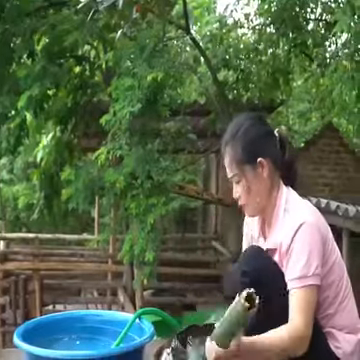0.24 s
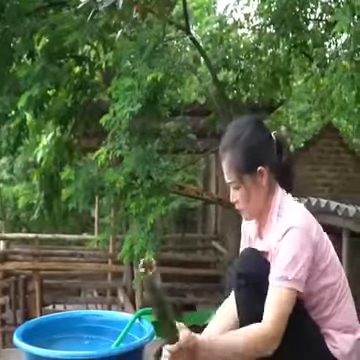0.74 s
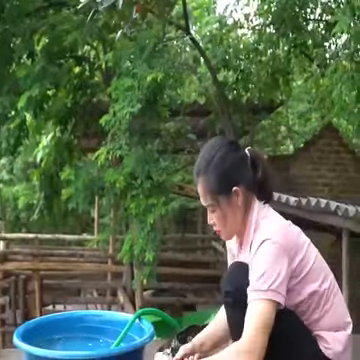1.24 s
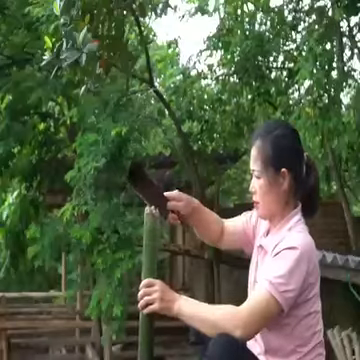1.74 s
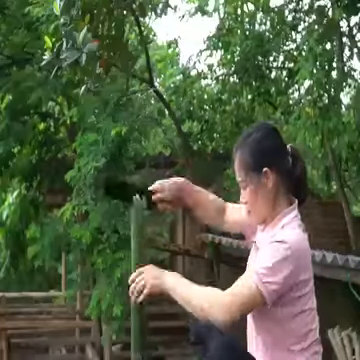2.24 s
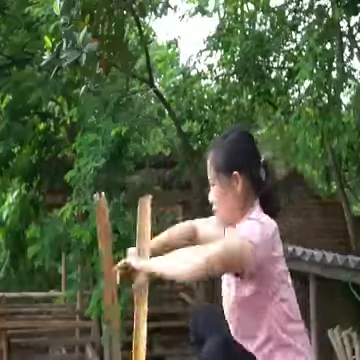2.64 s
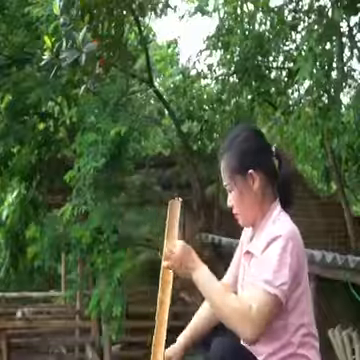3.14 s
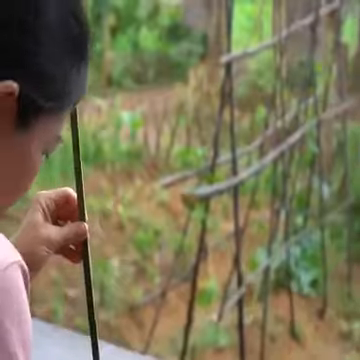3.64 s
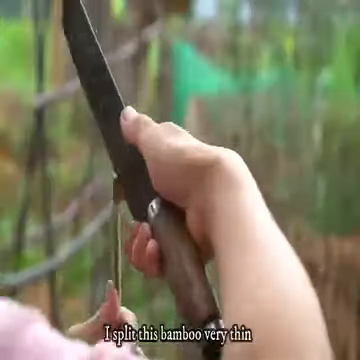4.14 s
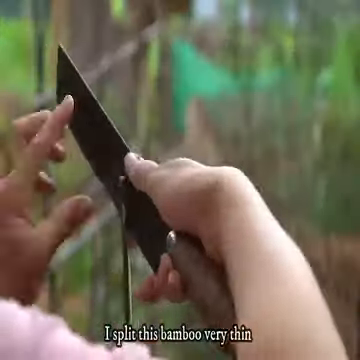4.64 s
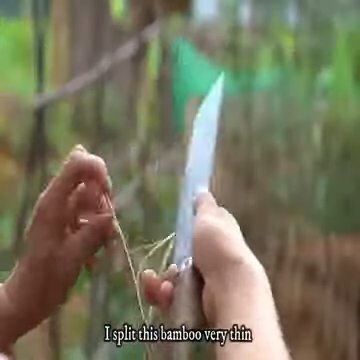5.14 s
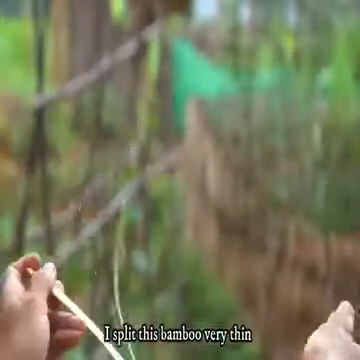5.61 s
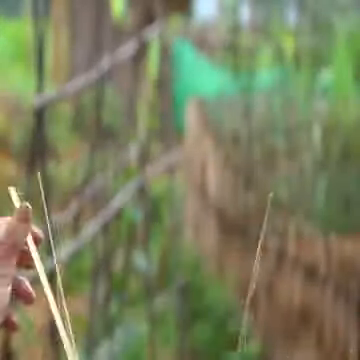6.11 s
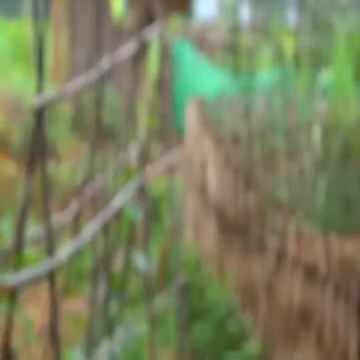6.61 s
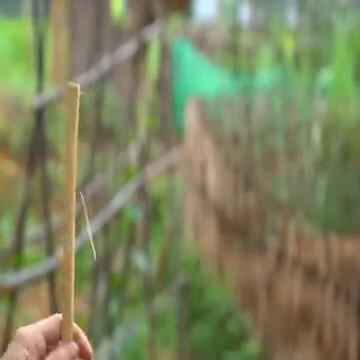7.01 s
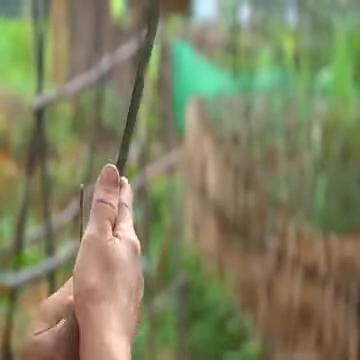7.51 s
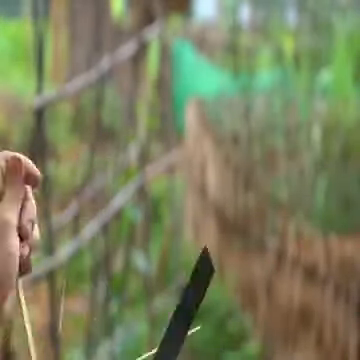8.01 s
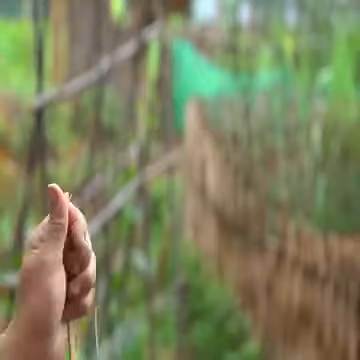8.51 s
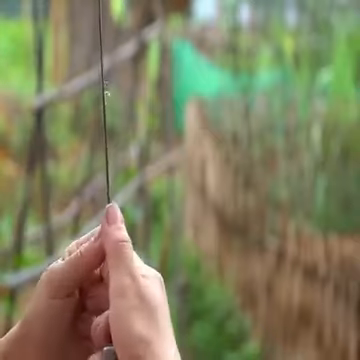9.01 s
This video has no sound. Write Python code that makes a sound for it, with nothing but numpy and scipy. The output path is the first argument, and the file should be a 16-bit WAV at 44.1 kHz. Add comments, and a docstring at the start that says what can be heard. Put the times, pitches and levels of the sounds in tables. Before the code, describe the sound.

Outdoors amid steady insect buzz, a bamboo pole is chopped with deep hollow knocks, then a thin strip is quietly tapped, peeled and snapped.

```python
"""Splitting and peeling green bamboo

A heavy knife is knocked into the end of a standing bamboo pole: its wall rings, it thuds on the ground, fibres tear.
Then a thin slat is tapped and peeled: short damped rings, slips built of tiny catches, and snaps of noise.
Insects buzz in the trees (bands of noise), brighter and louder at the second spot, with faint far-off tones.
The open air hushes and a light wind rumbles on the microphone, both made from coloured noise."""
import sys
import numpy as np
from scipy import signal
from scipy.fft import rfft, irfft, next_fast_len
from scipy.io import wavfile
from scipy.ndimage import uniform_filter1d

SR = 44100
rng = np.random.default_rng(int(sys.argv[2]) if len(sys.argv) > 2 else 0)


def wav_out(sig):
    """Save sig, one row per channel (or a flat mono array), as 16-bit PCM at SR to the path in sys.argv[1]."""
    wavfile.write(sys.argv[1], SR, np.round(np.clip(np.atleast_2d(sig).T, -1, 1) * 32767).astype(np.int16))


N = 408366
TIME = np.arange(N) / SR   # seconds from the start
AGE = np.arange(SR // 3) / SR   # seconds since a contact

# Blows on the pole: (time [s], wall level [dB], pitch favoured by the struck place [Hz],
# contact brightness [Hz], thud level [dB], thud pitch [Hz], fibre crack level [dB],
# time between rebounds [s], loss per rebound [dB])
POLE_BLOWS = [(0.002, -8, 470, 3540, -9.5, 169, -18, .009, 9),
              (0.394, -34, 480, 600, -27, 250, -65, .01, 16),
              (0.4646, -11, 890, 910, -18.5, 228, -59, .006, 6),
              (0.509, -36, 480, 600, -21.5, 187, -66, 0.0117, 10),
              (0.5605, -18.5, 1180, 1400, -28.5, 244, -58, .004, 20),
              (0.908, -13, 1730, 2310, -4, 377, -30.5, .0105, 12),
              (2.0246, -15, 1000, 2280, -1, 247, -23.5, 0.0079, 11.5),
              (2.2609, -10, 800, 850, 4.5, 252.5, -26.5, 0.021, 17.5),
              (2.573, -16.5, 910, 2300, -28, 333, -22.5, 0.0049, 4.5),
              (3.225, -12, 970, 2300, -11.5, 330, -25.5, .013, 9.5),
              (3.2691, -18, 634, 1150, -20, 316, -40, .009, 3.5),
              (3.800, -22, 890, 1400, -23.5, 393, -53, 0.0096, 4.5)]
# Ringing tones of the pole's wall: (pitch [Hz], level [dB], share of the decay time [ratio])
POLE_TONES = [(483, -4, 0.66), (774, -6, 0.49), (867, -5, 0.85), (968, -10.5, 1.13), (1162, -4, 0.74),
              (1382, -2.5, 0.57), (1612, -4, 0.78), (2043, -8.5, 0.86), (2500, -15.5, 2.4), (3400, -4, 0.4),
              (4286, 0, 0.26)]
# Pole against the ground: (multiple of the thud pitch [ratio], level [dB], share of its decay time [ratio])
GROUND_TONES = [(.52, 2, 0.58), (1, 2.5, 0.83), (1.27, -3, 0.92), (1.75, -10.5, 0.9)]
# Colour of tearing fibres: (frequency [Hz], level per Hz [dB])
FIBRE_COLOUR = [(200, -1.5), (900, 12), (1800, -8), (2600, -3.5), (3600, 2), (5000, -3.5), (7000, -12),
                (10000, -17), (15500, -25)]
# Knife taps on the slat: (time [s], level [dB], favoured pitch [Hz], contact brightness [Hz], decay by 60 dB [s])
SLAT_TAPS = [(4.1707, -12.5, 1520, 2190, 0.018), (4.428, -11.5, 1480, 1350, 0.016),
             (6.645, -22, 450, 900, 0.03), (7.120, -38, 1600, 2500, 0.013), (7.156, -27, 1300, 2500, 0.011),
             (7.689, -36, 890, 785, 0.05), (8.0687, -36, 636, 700, 0.017), (8.5197, -33, 634, 2000, 0.0098),
             (8.5998, -38, 900, 795, 0.025)]
# Ringing tones of the slat: (pitch [Hz], level [dB], share of the decay time [ratio])
SLAT_TONES = [(467, 2.5, 0.95), (614, -0.5, 0.83), (948, -1.5, 1.74), (1080, -5.5, 0.87), (1260, 2, 0.52),
              (1565, -1, 0.78), (2335, -6.5, 0.79), (3130, -3, 0.79), (4230, -4, 0.55)]
# Bamboo slips along the blade: (time [s], rms level [dB], brightness [Hz])
BLADE_SLIPS = [(0.877, -48.5, 1300), (2.559, -37, 900), (2.702, -45, 2980), (2.923, -47, 2010),
               (3.213, -37, 700), (3.233, -33, 1550), (3.488, -48, 1200), (3.762, -43.5, 700),
               (3.935, -44, 890), (4.071, -35, 1170), (4.243, -43.5, 1020), (4.315, -45, 1270),
               (4.805, -50, 910), (5.915, -45.5, 450), (6.162, -43, 610), (6.645, -41.5, 2000),
               (6.893, -45, 500), (7.05, -38.5, 2020), (7.981, -46, 1740), (8.165, -44, 1500),
               (8.357, -44, 2800), (8.425, -43.5, 2950), (8.817, -45.5, 2400)]
# Fingers work along the slat in runs of faint slips: (start [s], end [s], typical rms level [dB])
HANDLING_RUNS = [(3.998, 4.41, -51.5), (7.569, 7.85, -49.5), (8.529, 8.88, -49)]
# Dry fibres snap: (time [s], level [dB], decay by 60 dB [s])
FIBRE_SNAPS = [(0.266, -42, 0.046), (4.777, -49, .04), (6.153, -30, 0.054)]
# Colour of a snap: (frequency [Hz], level per Hz [dB])
SNAP_COLOUR = [(500, 5), (1000, 2), (2500, 2.5), (5000, 1), (9000, -4), (15500, -10)]
# The nearest insect: (pitch [Hz], half width [Hz], typical level [dB], pulses per second [Hz])
NEAR_INSECT = (4310, 137, -52.5, 43.5)
# Bands of the insect chorus: (pitch [Hz], half width [Hz],
# relative level at the first spot [dB], relative level at the second spot [dB])
CHORUS_BANDS = [(2835, 370, -11.5, -7), (3920, 610, -5, -4), (5210, 520, -5.5, -4.5),
                (5670, 400, -14.5, -7), (6500, 1240, -8.5, -7)]
# Relative level of the chorus, one list for each spot: (time [s], level [dB])
CHORUS_SWELL = [
    [(0.0, -47), (2.12, -49), (2.81, -47), (3.84, -51)],
    [(3.9, -45.5), (4.05, -46.5), (4.97, -44), (9.26, -48)],
]
# Colour of the highest insects: (frequency [Hz], level per Hz [dB])
SHRILL_COLOUR = [(5500, -15), (6900, -9.5), (7500, 1), (9000, -2), (10200, -6), (10700, -11), (11900, -9),
                 (12400, -15), (13800, -19.5), (15500, -35)]
# Bouts of the highest insects: (start [s], crest [s], stop [s], level at the crest [dB])
SHRILL_BOUTS = [(0, .45, .7, -59.5), (1.2, 2.3, 4, -60.5), (3.868, 4.255, 4.8, -49),
                (4.6, 5.85, 6.16, -49.5), (6.0, 7.157, 7.57, -49.5), (7.6, 8.449, 9.17, -54.5)]
# Faint held tones far away, perhaps birds: (middle [s], half length [s], pitch [Hz], level [dB])
FAR_TONES = [(1.22, 0.19, 1164, -62.5), (1.83, 0.12, 578, -62), (3.56, 0.21, 562, -61),
             (8.92, 0.2, 665, -58)]
# Relative level of the open air: (time [s], level [dB])
AIR_LEVEL = [(0.0, -55.5), (1.29, -57.5), (2.32, -59.5), (4.3, -54.5), (4.62, -57), (7.14, -56),
             (8.85, -55), (9.26, -56.5)]
# Colour of the open air at each spot: (frequency [Hz], level per Hz [dB])
AIR_COLOUR_FIRST = [(80, -0.5), (150, 2.5), (300, -1.5), (600, -4.5), (1150, -7.5), (1400, -12),
                    (1850, -15.5), (3000, -10.5), (8000, -32), (15000, -44)]
AIR_COLOUR_SECOND = [(80, 1), (220, -6), (400, -7), (700, -9), (900, -8), (1200, -10.5), (1900, -13.5),
                     (3000, -22), (8000, -39), (15000, -41)]
# Gusts on the microphone: (time [s], slow swell level [dB], relative buffet level [dB], half length [s])
WIND_GUSTS = [(0.018, -17.5, -37, 0.1), (0.488, -29, -48, 0.18), (0.855, -30, -57, 0.19),
              (1.49, -30.5, -65, 0.094), (3.15, -32.5, -50.5, 0.31), (3.783, -28.5, -49, 0.13),
              (4.174, -18.5, -36.5, 0.18), (4.435, -24.5, -67, 0.24), (6.125, -30, -66, 0.2),
              (6.744, -34, -58, .27), (8.252, -39, -67, 0.27)]
# Colour of the slow swell: (frequency [Hz], level per Hz [dB])
SWELL_COLOUR = [(10, -5.5), (20, 6), (28, -1.5), (45, -7), (70, -23), (180, -40), (2000, -100)]
# Colour of the quicker buffets: (frequency [Hz], level per Hz [dB])
BUFFET_COLOUR = [(30, -27), (55, -5.5), (75, 1.5), (105, -8.5), (180, -17.5), (500, -62), (2000, -100)]

REBOUNDS = 2
WALL_T60_S, CRACK_T60_S = 0.062, 0.069   # a t60 is the time taken to fade by 60 dB
THUD_CYCLES = 7.67   # cycles to fade by 60 dB, for a thud of 0 dB
THUD_DAMPING = 0.19   # a harder blow digs the pole in and shortens the thud
SLIP_S = 0.03   # time scale of a slip
HANDLING_PER_S, HANDLING_HZ, HANDLING_SPREAD_DB = 22.0, 905, 2.5
# slope around a bout's crest, extra slope after its stop, and the level between bouts
BOUT_SWELL_DB_PER_S, BOUT_EDGE_DB_PER_S, SHRILL_REST_DB = 5, 79, -63.5
MOVE_S = 3.868   # the second spot begins here
CUTOFF_HZ = 15700


def pole():
    """Each contact rings the wall, drives the pole against the ground and tears fibres."""
    out = np.zeros(N)
    for s, wall_db, favoured_hz, contact_hz, thud_db, thud_hz, crack_db in contacts():
        wall = from_db(wall_db) * wall_ring(favoured_hz, contact_hz)
        thud = from_db(thud_db) * ground_thud(thud_db, thud_hz)
        crack = from_db(crack_db) * fibre_crack()
        add(out, s, wall + thud + crack)
    return out


def contacts():
    """Each blow is followed by quick rebounds, every one weaker by the same step."""
    for s, wall_db, favoured_hz, contact_hz, thud_db, thud_hz, crack_db, gap, loss_db in POLE_BLOWS:
        for k in range(REBOUNDS + 1):
            lost = k * loss_db
            yield (s + k * gap, wall_db - lost, favoured_hz, contact_hz,
                   thud_db - lost, thud_hz, crack_db - lost)


def wall_ring(favoured_hz, contact_hz, crunch_db=-7, crunch_t60=0.08):
    """The hollow wall rings at its own pitches while the contact grinds for a moment."""
    ring = struck(POLE_TONES, favoured_hz, contact_hz, WALL_T60_S, spread_db=1., favour_db=13, octaves=0.32)
    chatter = rng.standard_normal(len(AGE)) * dying(crunch_t60)
    short_ring = struck(POLE_TONES, favoured_hz, contact_hz, 0.0036, spread_db=2.5)
    crunch = signal.fftconvolve(chatter, short_ring)[:len(AGE)]
    return ring + from_db(crunch_db) * crunch / np.abs(crunch).max()


def ground_thud(thud_db, thud_hz, shake_hz=39, shake_db=-24, shake_t60=0.71):
    """The pole hits the ground with a few low, quickly damped tones; a deep low tone rings on after."""
    t60 = THUD_CYCLES / thud_hz * from_db(-THUD_DAMPING * thud_db)
    thud = np.zeros(len(AGE))
    for k, (ratio, db, share) in enumerate(GROUND_TONES):
        tone = np.sin(2 * np.pi * ratio * thud_hz * AGE)
        thud += (-1) ** k * from_db(db) * tone * dying(share * t60)
    thud = low_pass(scattered(thud, level_db=-9.5, t60=0.084), 930)
    shake = from_db(shake_db) * np.sin(2 * np.pi * shake_hz * AGE) * dying(shake_t60)
    return thud + shake


def fibre_crack(grain_db=2.0):
    """Tearing fibres make noise of uneven strength, because they give way in bundles."""
    bundle_times = AGE[::40]
    bundles = np.interp(AGE, bundle_times, rng.standard_normal(len(bundle_times)))
    tearing = rms_one(noise(FIBRE_COLOUR, len(AGE)) * from_db(grain_db * bundles))
    return tearing * dying(CRACK_T60_S) * (1 - dying(0.004))


def slat():
    """The thin slat gives short dry taps, slips along the blade and snapping fibres."""
    out = np.zeros(N)
    for s, db, favoured_hz, contact_hz, t60 in SLAT_TAPS:
        add(out, s, from_db(db) * slat_tap(favoured_hz, contact_hz, t60))
    for s, db, bright_hz in BLADE_SLIPS + faint_slips():
        add(out, s, from_db(db) * slip(bright_hz))
    for s, db, t60 in FIBRE_SNAPS:
        add(out, s, from_db(db) * noise(SNAP_COLOUR, len(AGE)) * dying(t60))
    return out


def slat_tap(favoured_hz, contact_hz, t60):
    """The hand gives under the blade, the edge bites and the slat rings briefly."""
    push = from_db(-14) * np.sin(2 * np.pi * 170 * AGE) * dying(0.028)
    tick = from_db(-22) * noise(FIBRE_COLOUR, len(AGE)) * dying(0.0098)
    ring = struck(SLAT_TONES, favoured_hz, contact_hz, t60, spread_db=3.5, favour_db=1.5)
    return push + tick + scattered(ring, level_db=-8, t60=0.019)


def slip(bright_hz, catches_per_s=1100):
    """Many tiny catches of the edge set the slat ringing; the bare scrape is heard under it."""
    stroke = AGE / SLIP_S * np.exp(-3 * AGE / SLIP_S)   # swells, then fades
    caught = rng.random(len(AGE)) < catches_per_s / SR
    catches = caught * rng.standard_normal(len(AGE)) * stroke
    ring = struck(SLAT_TONES, bright_hz, bright_hz, 0.014, spread_db=4.5, favour_db=2.5, octaves=0.8)
    rub = rms_one(signal.fftconvolve(catches, ring)[:len(AGE)])
    rub += from_db(-8.0) * rms_one(low_pass(catches, bright_hz))
    return rub * np.sqrt(SLIP_S * SR / (np.sum(rub ** 2) + 1e-20))   # rms 1 if packed into SLIP_S


def faint_slips(spread_octaves=0.35):
    """Handling makes small slips at uneven moments, listed as (time [s], rms level [dB], brightness [Hz])."""
    slips = []
    for start, end, run_db in HANDLING_RUNS:
        for s in np.arange(start, end, 1 / HANDLING_PER_S):
            moment = s + rng.random() / HANDLING_PER_S / 2
            db = run_db + HANDLING_SPREAD_DB * rng.standard_normal()
            bright_hz = HANDLING_HZ * 2 ** (spread_octaves * rng.standard_normal())
            slips.append((moment, db, bright_hz))
    return slips


def insects(moved, waver_db=1.0):
    """One near insect throbs over a broad chorus; the highest voices come and go."""
    near_hz, near_width_hz, near_db, per_s = NEAR_INSECT
    pulse = np.sin(2 * np.pi * per_s * np.cumsum(1 + 0.011 * drift(3.43)) / SR)   # its rate wanders slightly
    near = from_db(near_db + waver_db * drift(9)) * buzz(near_hz, near_width_hz) * (1 + .27 * pulse)
    shrill = shrill_level() * noise(SHRILL_COLOUR, N) * (1 + .15 * pulse)
    swell = from_db(-3.0) * in_time(np.vstack(CHORUS_SWELL)) * (1 + .1 * pulse)
    chorus = np.zeros(N)
    for hz, width_hz, first_db, second_db in CHORUS_BANDS:
        band_db = first_db + moved * (second_db - first_db) + waver_db * drift(9)
        chorus += swell * buzz(hz, width_hz) * from_db(band_db)
    return near + shrill + chorus


def shrill_level():
    """The highest insects swell to a crest, ebb and break off; the strongest bout begun sets the gain."""
    bouts = [db - BOUT_SWELL_DB_PER_S * np.abs(TIME - crest) - BOUT_EDGE_DB_PER_S * np.maximum(TIME - stop, 0)
             for _, crest, stop, db in SHRILL_BOUTS]
    begun = [TIME >= start for start, *_ in SHRILL_BOUTS]
    return from_db(np.max(bouts, axis=0, where=begun, initial=SHRILL_REST_DB))


def buzz(hz, width_hz):
    """Many unrelated buzzers around one pitch add up to a band of noise, rms 1."""
    size = next_fast_len(N)
    bins = np.fft.rfftfreq(size, 1 / SR)
    resonance = 1 / (1 + np.abs((bins - hz) / width_hz) ** 5) ** .5
    return rms_one(irfft(resonance * rfft(rng.standard_normal(size)))[:N])


def far_calls(width_hz=14, octave_db=-10):
    """Distance blurs each call into a narrow tone and its octave that swell and fade."""
    out = np.zeros(N)
    for s, half, hz, db in FAR_TONES:
        swell = from_db(db) * np.exp(-((TIME - s) / half) ** 4)
        out += swell * (buzz(hz, width_hz) + from_db(octave_db) * buzz(2 * hz, 2 * width_hz))
    return out


def air(moved):
    """A faint outdoor hush; each gust swells and buffets on the microphone."""
    hush = np.sqrt(1 - moved) * noise(AIR_COLOUR_FIRST, N) + np.sqrt(moved) * noise(AIR_COLOUR_SECOND, N)
    # the breeze between gusts eases steadily from the first level to the second
    swell = wind_level((-38.5, -42), [(s, db, half) for s, db, _, half in WIND_GUSTS])
    buffets = wind_level((-51, -69), [(s, db, half) for s, _, db, half in WIND_GUSTS])
    wind = gusts(SWELL_COLOUR, swell) + from_db(4.5) * gusts(BUFFET_COLOUR, buffets)
    return from_db(3.5) * in_time(AIR_LEVEL) * hush + wind


def wind_level(calm_db, peaks):
    """Bell-shaped gusts of (time [s], level [dB], half length [s]) add their power to the breeze."""
    power = from_db(np.linspace(*calm_db, N)) ** 2
    for s, db, half in peaks:
        power += (from_db(db) * np.exp(-((TIME - s) / half) ** 2)) ** 2
    return np.sqrt(power)


def gusts(spectrum, level):
    """Lumpy low noise, evened out over a sixth of a second, takes its strength from the wind."""
    lumps = noise(spectrum, N)
    return level * lumps / np.sqrt(uniform_filter1d(lumps ** 2, size=SR // 6))


def struck(modes, favoured_hz, contact_hz, t60, spread_db, favour_db=7, octaves=0.23):
    """The struck place favours some tones, a softer contact dulls the high ones. Peak 1."""
    hz, db, share = np.transpose(modes)
    favour = favour_db * np.exp(-(np.log2(hz / favoured_hz) / octaves) ** 2)
    db = db + favour + spread_db * rng.standard_normal(len(hz))
    hz = hz * (1 + 0.016 * rng.standard_normal(len(hz)))   # the grip detunes them a little
    rings = np.zeros(len(AGE))
    for k in range(len(hz)):
        rings += (-1) ** k * from_db(db[k]) * np.sin(2 * np.pi * hz[k] * AGE) * dying(share[k] * t60)
    soft = low_pass(rings, contact_hz)
    return soft / np.abs(soft).max()


def scattered(sound, level_db, t60):
    """Rattle and nearby surfaces add a short, dense cloud of small copies."""
    cloud = rng.standard_normal(len(AGE)) * dying(t60) * (1 - dying(t60 / 3))
    copies = signal.fftconvolve(sound, cloud / np.linalg.norm(cloud))[:len(sound)]
    return sound + from_db(level_db) * copies


def noise(spectrum, size):
    """Noise of a given colour, rms 1."""
    hz, db = np.transpose(spectrum)
    padded = next_fast_len(size)
    bins = np.maximum(np.fft.rfftfreq(padded, 1 / SR), 1)
    gain = from_db(np.interp(np.log(bins), np.log(hz), db))
    return rms_one(irfft(gain * rfft(rng.standard_normal(padded)))[:size])


def dying(t60):
    """An envelope that loses 60 dB in t60 seconds (at least 1 ms)."""
    return np.exp(-np.log(1000) * AGE / max(t60, 1e-3))


def drift(per_s):
    """Slow random wandering around 0, with a typical size of 1 and per_s new values a second."""
    return np.interp(TIME * per_s, np.arange(N // 100), rng.standard_normal(N // 100))


def low_pass(x, hz, order=2):
    """Soften everything above hz."""
    return signal.sosfilt(signal.butter(order, min(hz, SR / 2 - 100), fs=SR, output="sos"), x)


def from_db(db):
    """Turn decibels into a gain."""
    return 10 ** (np.asarray(db) / 20)


def rms_one(x):
    """Scale a sound to an rms of 1."""
    return x / np.sqrt(np.mean(x ** 2) + 1e-20)


def in_time(rows):
    """Turn a level curve into a gain at every sample."""
    return from_db(np.interp(TIME, *np.transpose(rows)))


def add(out, s, sound):
    """Mix a sound in at its moment."""
    i = max(round(s * SR), 0)
    out[i:i + len(sound)] += sound[:N - i]


def scene():
    """Bamboo work in front of insects, far tones and air."""
    moved = np.clip((TIME - MOVE_S) / 0.013, 0, 1)   # 0 at the first spot, 1 at the second
    dip = 1 - 0.88 * np.exp(-((TIME - 3.863) / 0.01) ** 2)   # the background dips briefly between the spots
    background = insects(moved) + far_calls() + air(moved)
    return (pole() + slat() + dip * background)[None]


def record(dry, top=1.0):
    """The loudest peaks overload and flatten towards the top level; the highest treble is cut."""
    held = dry / (1 + (dry / top) ** 6) ** (1 / 6)
    return signal.sosfilt(signal.ellip(10, .1, 90, CUTOFF_HZ, fs=SR, output="sos"), held)


dry = scene()
out = record(dry)
wav_out(out)
```